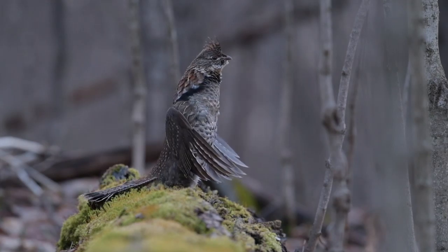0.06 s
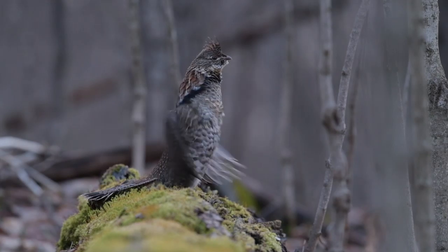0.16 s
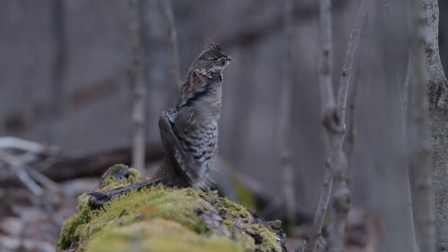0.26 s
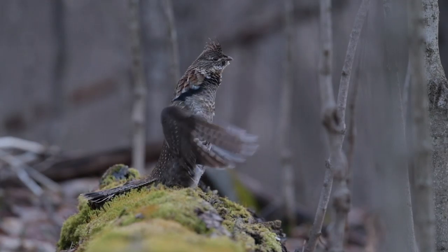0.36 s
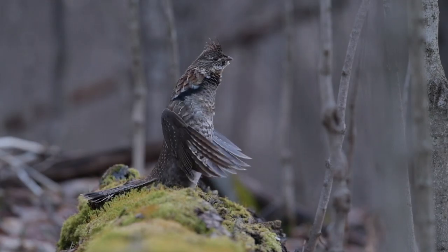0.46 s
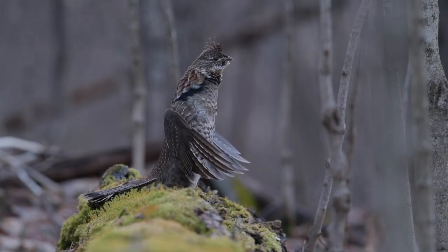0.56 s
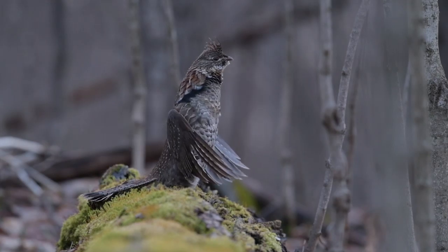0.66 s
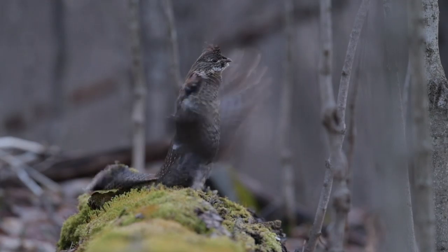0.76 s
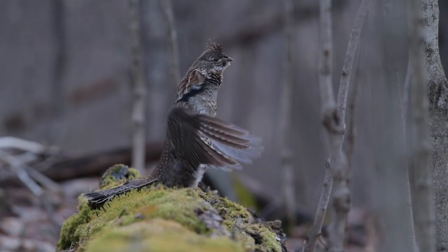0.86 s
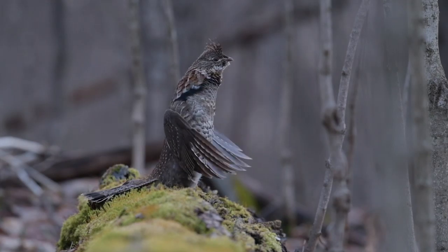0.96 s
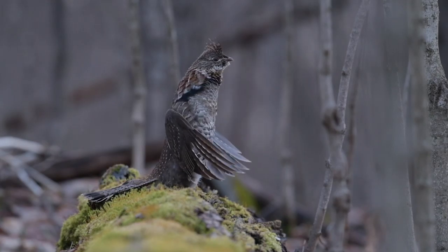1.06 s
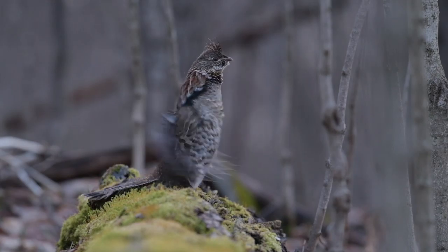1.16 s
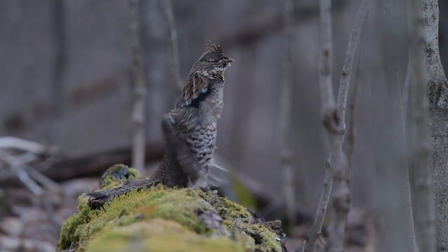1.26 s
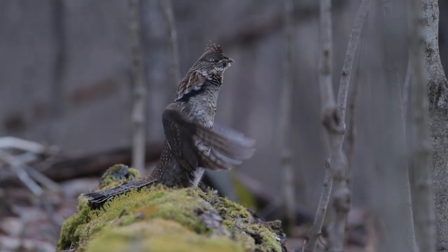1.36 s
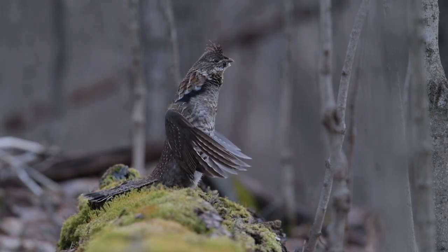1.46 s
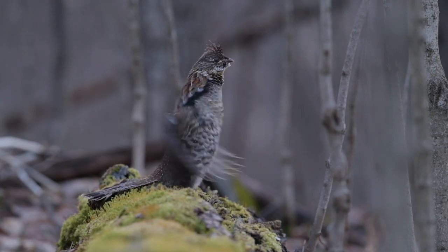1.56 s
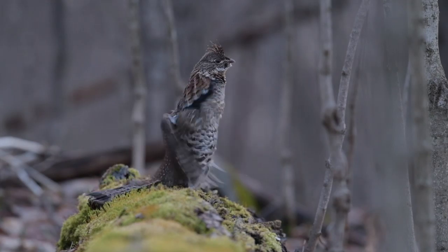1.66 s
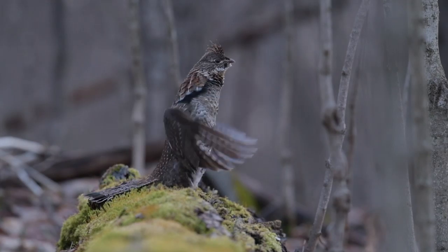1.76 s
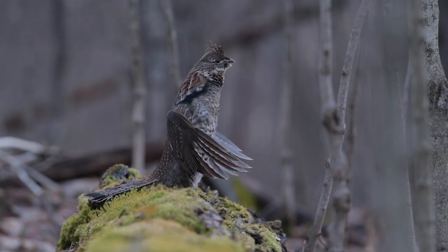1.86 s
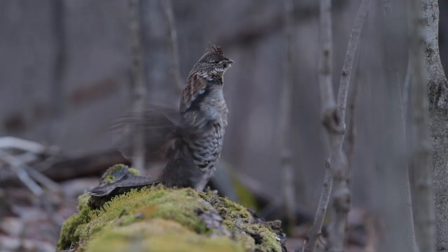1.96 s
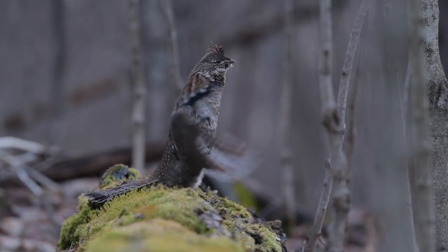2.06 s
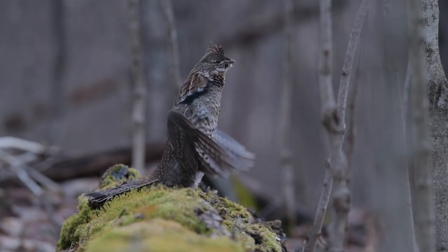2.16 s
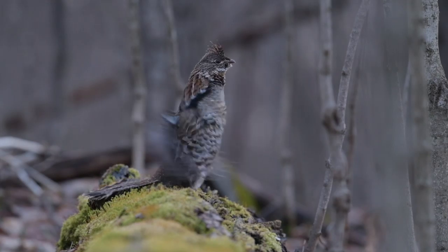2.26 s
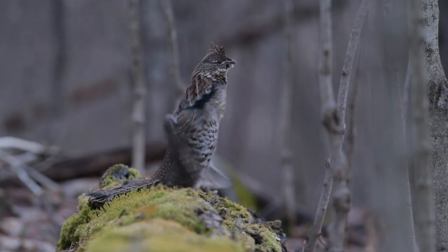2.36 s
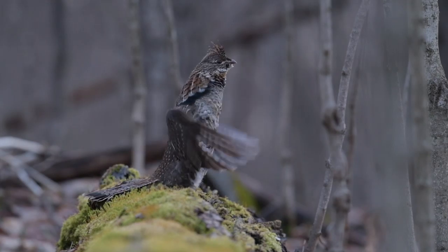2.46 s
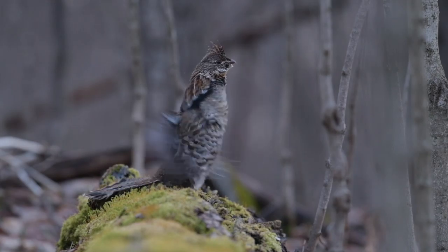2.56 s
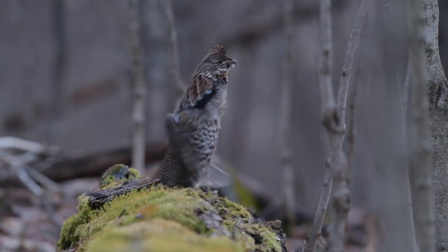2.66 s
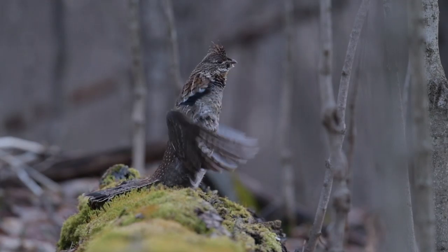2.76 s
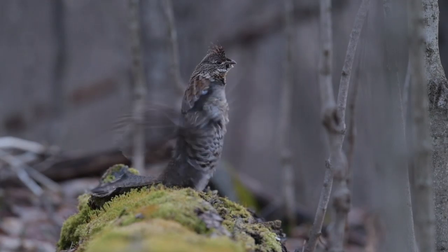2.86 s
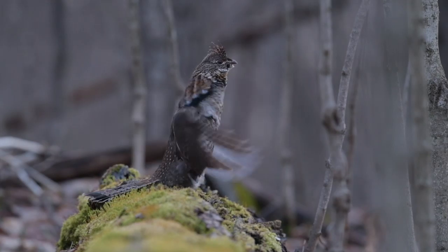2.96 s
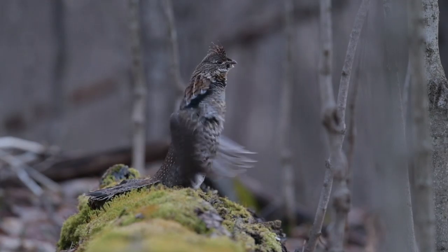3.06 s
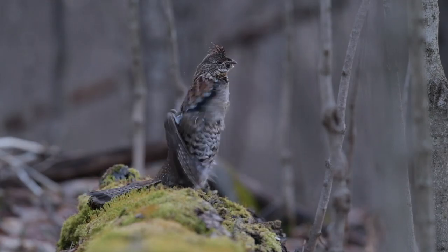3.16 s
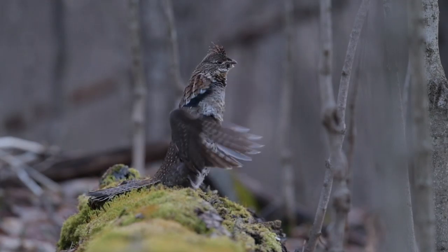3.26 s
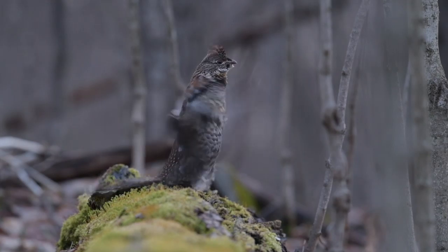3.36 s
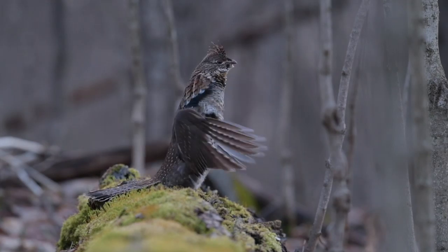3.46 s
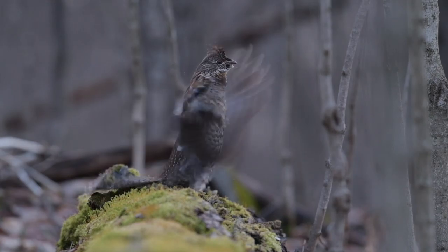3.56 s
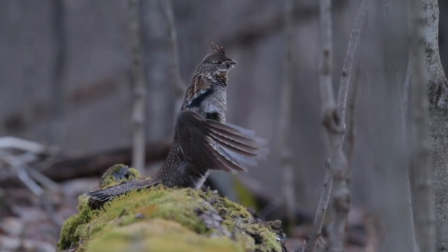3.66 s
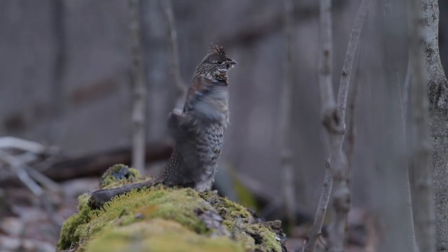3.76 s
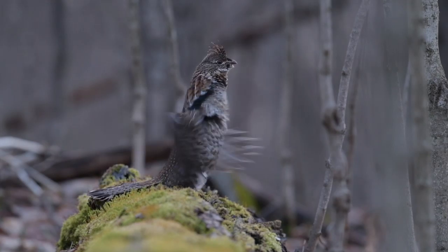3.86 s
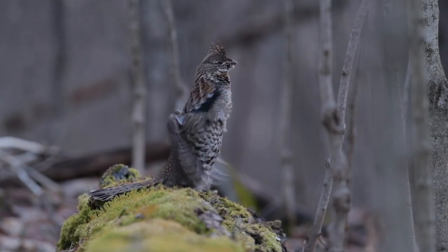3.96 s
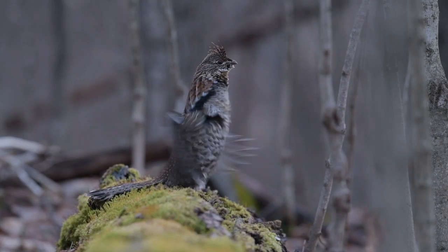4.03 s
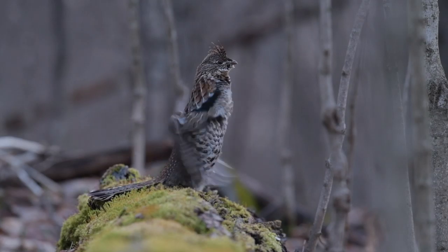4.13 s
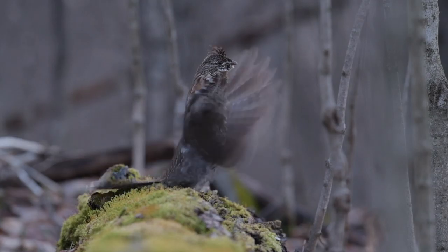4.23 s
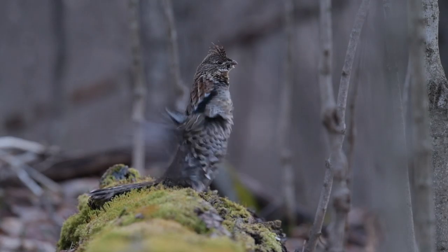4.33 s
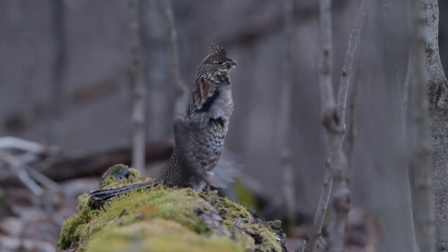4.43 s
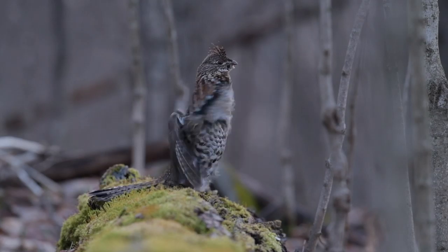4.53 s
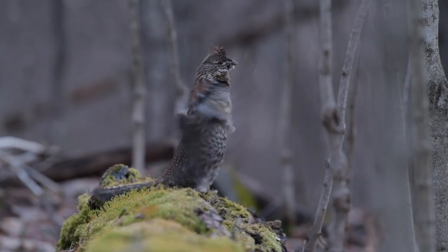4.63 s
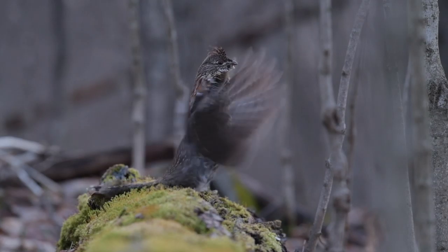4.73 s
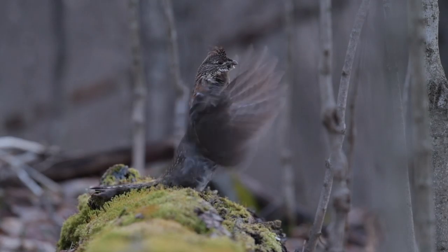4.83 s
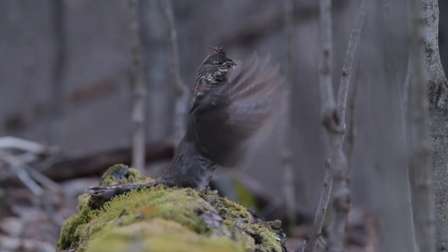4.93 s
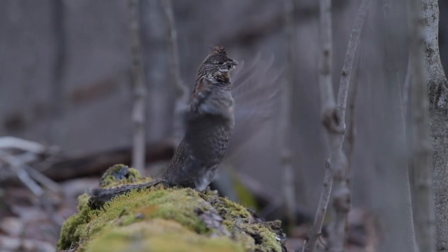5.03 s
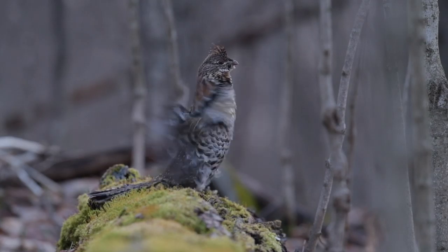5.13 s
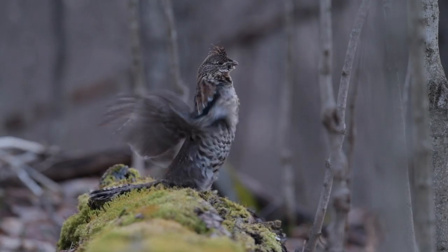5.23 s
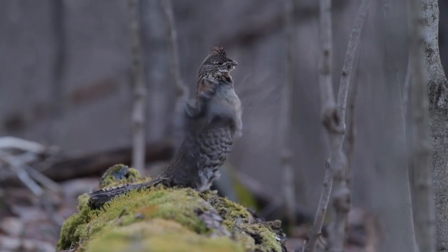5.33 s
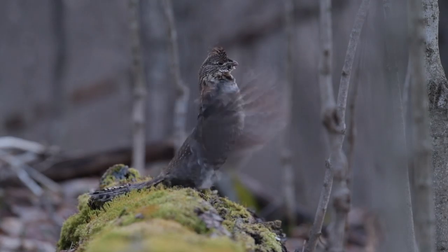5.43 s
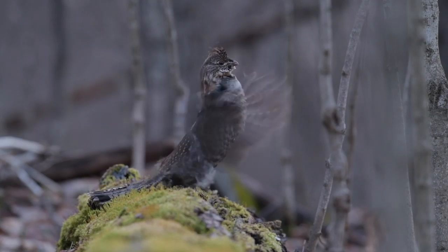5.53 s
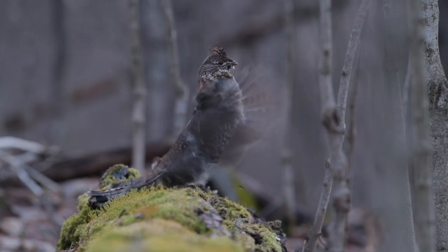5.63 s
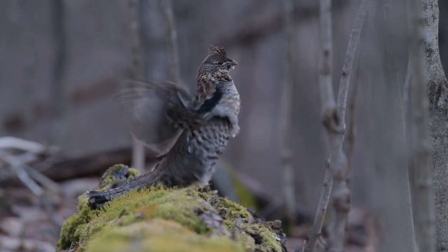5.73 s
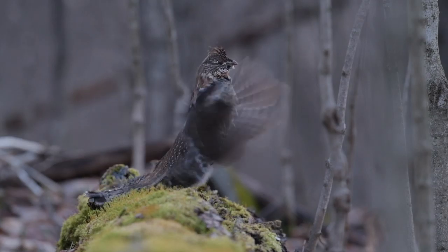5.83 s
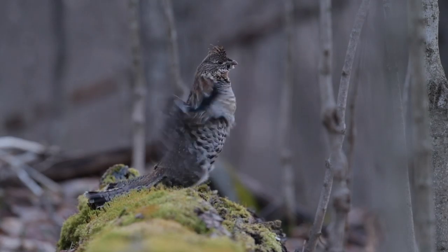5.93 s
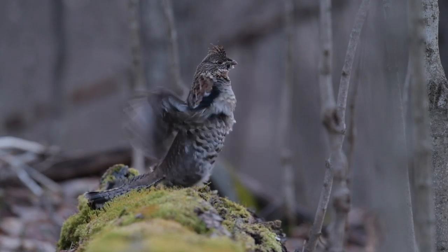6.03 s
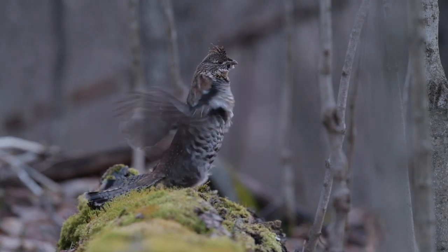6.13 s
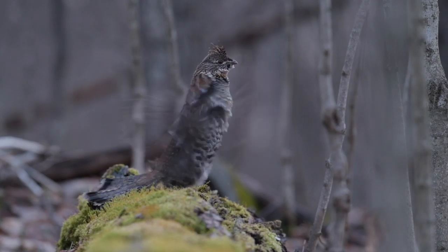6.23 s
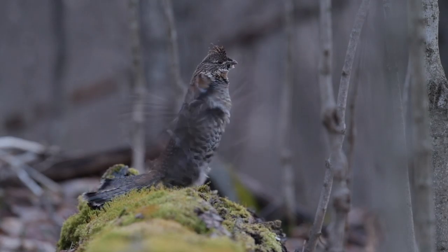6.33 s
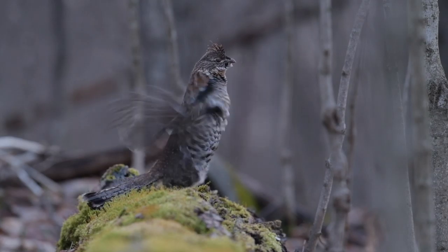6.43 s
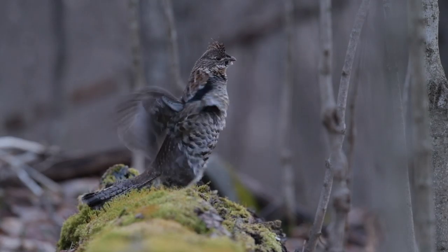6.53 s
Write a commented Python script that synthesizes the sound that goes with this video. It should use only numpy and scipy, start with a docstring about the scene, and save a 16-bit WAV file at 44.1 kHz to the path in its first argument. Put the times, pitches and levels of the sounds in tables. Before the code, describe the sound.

A grouse drums far off in a forest, dull and echoing, and at once another joins on a log close to the microphone. Each near wing beat is a low thump with a rush of feathers. Both birds speed up into a fast roll, then slow and soften. A few small dry ticks, one faint low hoot and faint distant bird whistles come through, over soft hiss and a brief, faint faraway drone.

```python
"""Soft microphone hiss, and a distant drone that swells and fades. Far off in the wood a grouse starts
drumming, dull and echoing; at once another joins from a mossy log near the microphone. Each near wing beat
is a low thump of pushed air with a rush of feathers. Both birds speed up into a roll and slow again.
Small dry ticks, one low hoot and the faint whistles of distant birds come through the drumming."""
import sys
import numpy as np
from scipy import signal
from scipy.io import wavfile
from scipy.ndimage import uniform_filter1d

SR = 44100
rng = np.random.default_rng(int(sys.argv[2]) if len(sys.argv) > 2 else 0)


def put_to_file(sound):
    """Save the sound as 16-bit audio at rate SR, in the file named by the first command-line argument."""
    columns = np.atleast_2d(sound).T  # one column per channel
    safe = np.clip(columns, -1, 1)
    whole_steps = np.round(safe * 32767)
    wavfile.write(sys.argv[1], SR, whole_steps.astype(np.int16))


N = 290619
PULSE_T = np.arange(-.04, .04, 1 / SR)  # seconds around one wing beat


def gain_of(db):
    """Decibels to gain."""
    return 10 ** (np.asarray(db) / 20)


def unit_rms(x):
    """Scales to rms 1."""
    return x / np.sqrt(np.mean(x ** 2) + 1e-20)


def at_hz(table, hz):
    """Reads a spectrum table on a log-frequency axis."""
    f, value = np.transpose(table)
    return np.interp(np.log(hz + 1), np.log(f + 1), value)


def at_times(table, times):
    """Reads the value columns of a table whose rows start with a time."""
    when, *values = np.transpose(table)
    return [np.interp(times, when, v) for v in values]


def bell(t, top, rise, fall, flat=2):
    """A smooth hump of height 1 with its own rise and fall."""
    return np.exp(-abs((t - top) / np.where(t < top, rise, fall)) ** flat)


def train(times, size, shape, lead=.04):
    """One copy of shape for each event, starting lead seconds before it."""
    clicks = np.zeros(N)
    np.add.at(clicks, np.round(np.asarray(times) * SR).astype(int), size)
    return signal.fftconvolve(clicks, shape)[round(lead * SR):][:N]


def blend(times, size, roundness, sharp, rounded, lead=.04):
    """A train whose shape crossfades from sharp to rounded as roundness goes from 0 to 1."""
    sharp_part = train(times, size * (1 - roundness), sharp, lead)
    return sharp_part + train(times, size * roundness, rounded, lead)


def noise(spectrum, patchy_db, likeness=((1, 1), (2, 1)), balance=((1, 0), (2, 0))):
    """Two channels of coloured noise with drifting louder and softer patches."""
    hz = np.fft.rfftfreq(2048, 1 / SR)
    a, b, c, d, patches = rng.standard_normal((N // 512 + 5, 1025, 5)).T
    patches = unit_rms(uniform_filter1d(uniform_filter1d(patches, size=20, axis=0), size=6, axis=1))
    like = np.clip(at_hz(likeness, hz), -1, 1)[:, None]
    left = a + 1j * b
    right = like * left + np.sqrt(1 - like ** 2) * (c + 1j * d)
    tilt = at_hz(balance, hz)[:, None] / 2
    colour = gain_of(at_hz(spectrum, hz)[:, None] + patchy_db * patches)
    frames = np.array([left, right]) * colour * gain_of([tilt, -tilt])
    return unit_rms(signal.istft(frames, nperseg=2048, noverlap=1536)[1][:, :N])


# The microphone's noise floor. Each row: frequency in Hz, relative density in dB.
HISS_SPECTRUM = [(18, -27), (30, 0), (98, 3.5), (200, -9), (700, -12.5), (1490, -17), (3000, -20),
                 (6500, -22.5), (13500, -24.5), (14400, -21.5), (15300, -16.5), (15750, -21)]
# Each row: frequency in Hz, correlation between left and right.
HISS_LIKENESS = [(60, 1), (180, 0.67), (550, 0.6), (1650, 0.5), (4970, 0.55), (15000, -0.0)]
# Each row: frequency in Hz, left minus right in dB.
HISS_BALANCE = [(60, 0), (10000, 0), (11800, -3), (12600, 5), (13500, -14), (14400, 2), (15200, -1),
                (15800, 1)]


def microphone_hiss():
    """Steady noise, strongest and centred in the bass, wider in the treble."""
    return gain_of(-64.5) * noise(HISS_SPECTRUM, patchy_db=1, likeness=HISS_LIKENESS, balance=HISS_BALANCE)


# The drone, a long way off. Each row: band centre in Hz, width in Hz, relative level in dB.
DRONE_BANDS = [(336, 30, -8.5), (505, 82, -5.5), (700, 91, -1), (967, 96, -4.5), (1350, 75, -11.5)]


def distant_drone():
    """Narrow bands of noise that swell and fade together."""
    t, out = np.arange(N) / SR, 0
    for hz, width, db in DRONE_BANDS:
        lowpass = signal.butter(2, width / 2, fs=SR, output="sos")
        a, b = (signal.sosfilt(lowpass, rng.standard_normal((3, N))) for _ in range(2))
        band = a * np.cos(2 * np.pi * hz * t) + b * np.sin(2 * np.pi * hz * t)
        out = out + gain_of(db) * unit_rms(band[0] + 0.44 * band[1:])  # centre plus sides
    return gain_of(-69.1) * unit_rms(out) * bell(t, top=1.41, rise=1, fall=1.55, flat=2.9)


def beat_times(pace_table, first_s):
    """The time of every wing beat, counted from beat 0, and the pace leading up to it."""
    beat, pace = np.transpose(pace_table)
    pace = np.interp(np.arange(1, beat[-1] + 1), beat, pace)
    return first_s + np.append(0, np.cumsum(1 / pace)), np.append(pace[0], pace)


def wing_push(hz, trough, width, centre):
    """A short swing of air pressure; trough, width and centre are in seconds."""
    return -np.cos(2 * np.pi * hz * (PULSE_T - trough)) * bell(PULSE_T, centre, width, width)


def wing_stop(width):
    """The quick pressure drop as the wings stop, just ahead of the trough."""
    u = (PULSE_T + .0026) / width
    return -u * np.exp(-u ** 2)


# The grouse deep in the wood. Each row: beat number, pace in beats per second.
FAR_BEAT_PACE = [(1, 1.889), (6, 3.337), (8, 4.031), (13, 6.182), (16, 7.74), (17, 8.216), (18, 9.008),
                 (20, 10.124), (25, 14.909), (29, 22.14), (30, 18.883), (36, 12.675), (41, 9.303)]
# Each row: time in seconds, thump level in dB, echo level in dB.
FAR_LEVELS = [(.29, -44.3, -43.5), (2.1, -43.5, -44.6), (3, -41.6, -44), (4.9, -42.5, -44),
              (5.2, -43, -50.5), (5.5, -46.5, -50.6), (5.59, -40.5, -51), (5.72, -52, -49),
              (5.89, -45, -46), (6.08, -45.5, -52.5), (6.22, -41.5, -48), (6.52, -43, -53.1)]
# Returns from trunks and slope. Each row: delay in seconds, dB added to the echo level.
SLOPE_ECHOES = [(0.0195, 1), (.045, -17.5), (.064, -7.5), (.082, -11.5), (.1, -13.5)]


def far_grouse():
    """Thumps dulled by distance, each followed by the same few strong echoes."""
    times, _ = beat_times(FAR_BEAT_PACE, first_s=.287)
    thump_db, echo_db = at_times(FAR_LEVELS, times)
    roundness = np.interp(times, [4.7, 6.2], [0, 1])
    sharp = wing_push(hz=84, trough=-.0003, width=.0075, centre=.0043) + .8 * wing_stop(.0023)
    rounded = .9 * wing_push(hz=82, trough=0, width=.009, centre=0) + .5 * wing_stop(.0023)
    echo = wing_push(hz=86, trough=0, width=.0088, centre=.0055) + .35 * wing_stop(.0023)
    out = blend(times, gain_of(thump_db), roundness, sharp, rounded)
    for delay, db in SLOPE_ECHOES:
        heard = times + delay < (N - 1) / SR
        out += train(times[heard] + delay, gain_of(echo_db + db)[heard], echo)
    return out


def wood_reverb(x, t60):
    """Diffuse return from the trunks: sparse taps of random sign, a few differing left and right."""
    t = np.arange(SR // 2) / SR
    signs = rng.choice([-1., 1.], (len(t), 3)).T
    taps = signs * (rng.random((len(t), 3)).T < 400 / SR)  # 400 a second
    taps = (taps[0] + 0.079 * taps[1:]) * gain_of(-60 * t / t60) * (t > .015)
    return signal.fftconvolve(x[None], taps / np.linalg.norm(taps[0]), axes=1)[:, :N]


# The grouse on the log, near the microphone. Each row: beat number, pace in beats per second.
NEAR_BEAT_PACE = [(1, 2.143), (6, 3.894), (9, 5.02), (15, 7.561), (18, 9.279), (22, 11.429), (26, 14.619),
                  (29, 18.716), (30, 21.864), (33, 16.893), (39, 12.256), (42, 10.446), (43, 10.537)]
# Each row: time in seconds, thump level in dB, feather rush level in dB.
NEAR_LEVELS = [(.35, -36, -59.5), (.8, -33, -57), (2.9, -32, -57.5), (3.8, -33.6, -58.5),
               (4.25, -33, -58.5), (4.73, -36.5, -62), (5.05, -37.5, -60.5), (5.25, -36.5, -57.5),
               (5.45, -42.5, -61), (5.82, -38.5, -61.5), (6.11, -42.1, -64.5), (6.21, -55, -71)]
# Beats whose thump sounds softer. Each row: beat number, change in thump level in dB.
SOFTER_THUMPS = [(19, -1.5), (32, -5), (40, -5.1)]


def near_grouse():
    """The thumps and the feather sound of one set of wing strokes, growing rounder as the roll builds."""
    times, pace = beat_times(NEAR_BEAT_PACE, first_s=.353)
    thump_db, rush_db = at_times(NEAR_LEVELS, times)
    for beat, db in SOFTER_THUMPS:
        thump_db[round(beat)] += db
    roundness = np.interp(times, [3.54, 6], [0, 1])
    thumps = wing_thumps(times, gain_of(thump_db), roundness)
    feathers = feather_rush(times, pace, rush_db, roundness) + feather_flick(times, rush_db - 7.5)
    return thumps, feathers


def wing_thumps(times, size, roundness):
    """The wings push the air and stop short, and the stiff flight feathers whip briefly."""
    sharp = .86 * wing_push(hz=76, trough=.0006, width=.0088, centre=.0004)
    rounded = wing_push(hz=69, trough=.0002, width=.0094, centre=-.0006)
    whip = wing_push(hz=291, trough=-.0026, width=.0053, centre=-.00029)
    abruptness = .826 * bell(times, top=3.65, rise=2.4, fall=2.67)  # the hardest stops come midway
    pushes = blend(times, size, roundness, sharp, rounded)
    stops = train(times, size * abruptness, wing_stop(.0019))
    whips = train(times, size * (.045 + .013 * roundness), whip)
    return pushes + stops + whips


def stroke_power(width, crack_db, tail_db):
    """Power envelope of one rush, timed from the thump: a swish, a crack on top of it, a tail."""
    t = np.arange(-.05, .13, 1 / SR)
    swish = gain_of(-5.5) * bell(t, top=-.0013, rise=width, fall=width)
    crack = gain_of(crack_db) * bell(t, top=-.0074, rise=.0044, fall=.0035)
    tail = gain_of(tail_db) * bell(t, top=0, rise=width, fall=.052)
    return swish ** 2 + crack ** 2 + tail ** 2


def crackle(per_s, decay_s):
    """Papery flicks of feather against feather: sudden rises of the envelope that die quickly."""
    size = np.minimum(rng.exponential(1, N), 4) * (rng.random(N) < per_s / SR)
    return signal.lfilter([1], [1, -np.exp(-1 / (decay_s * SR))], size)


# Air through feathers, at close range. Each row: frequency in Hz, relative density in dB.
RUSH_SPECTRUM = [(240, -2), (400, -2.5), (1230, -11.5), (1890, -9.5), (3710, -12), (4070, -13.5),
                 (5530, -13), (7070, -16.5), (11600, -16), (15700, -21)]
# Low bands come later, so each rush darkens. Each row: top of the band in Hz, delay in seconds.
RUSH_DELAYS = [(1400, .006), (4000, .003), (20000, 0)]


def feather_rush(times, pace, rush_db, roundness):
    """Air rushes through the feathers on each stroke; air and leaves stir more as the pace rises."""
    sharp = stroke_power(width=.02, crack_db=3, tail_db=-11.1)
    rounded = stroke_power(width=.017, crack_db=1.6, tail_db=-17)
    power = blend(times, gain_of(rush_db) ** 2, roundness, sharp, rounded, lead=.05)
    flutter = unit_rms(uniform_filter1d(rng.standard_normal(N), size=90))  # feathers slip unevenly
    strokes = np.sqrt(abs(power)) * gain_of(1.5 * flutter)
    strokes *= .97 + .3 * crackle(per_s=260, decay_s=.0018)
    pace_now = np.interp(np.arange(N) / SR, times, pace, right=4.1)  # some stir outlasts the last beat
    stir = gain_of(-71) * (uniform_filter1d(pace_now, size=SR) / 10) ** .96
    air = noise(RUSH_SPECTRUM, patchy_db=.5)[0]
    rush, below = 0, 0
    for top_hz, delay in RUSH_DELAYS:
        up_to_top = signal.sosfiltfilt(signal.butter(2, top_hz, fs=SR, output="sos"), air)
        rush = rush + (up_to_top - below) * (np.roll(strokes, round(delay * SR)) + stir)
        below = up_to_top
    return rush


def feather_flick(times, db):
    """A dull flick as the feathers spread just ahead of each thump."""
    spread = train(times, gain_of(db), bell(PULSE_T, top=-.018, rise=.005, fall=.005), lead=.0397)
    return spread * unit_rms(signal.lfilter(*signal.iirpeak(1870, Q=2.6, fs=SR), rng.standard_normal(N)))


# Small ticks, centred and without echo. Each row: start in seconds, level in dB, pitch in Hz.
DRY_TICKS = [(1.677, -55, 3430), (2.6339, -52, 2120), (4.5155, -55, 2170), (4.688, -53, 2200),
             (5.2573, -64, 2100), (5.2809, -47.5, 2290), (5.306, -56, 2670), (5.3332, -50, 1940),
             (5.3893, -49, 2370), (5.4497, -51, 2080), (5.4868, -64, 2600), (5.808, -54.5, 2740),
             (5.891, -56, 2600)]


def dry_ticks():
    """Short gritty puffs of noise with a broad ring."""
    out, t = np.zeros(N), np.arange(400) / SR
    envelope = np.exp(-t / .0039) * np.minimum(t / .00015, 1)
    for start, db, hz in DRY_TICKS:
        grit = rng.standard_normal(len(t))
        ring = unit_rms(signal.lfilter(*signal.iirpeak(hz, Q=1.5, fs=SR), grit))
        out += train([start], gain_of(db), (.46 * ring + .27 * grit) * envelope, lead=0)
    return out


# One low hoot and small birds whistling, far from the microphone.
# Each row: start in seconds, length in seconds, first pitch in Hz, last pitch in Hz, level in dB.
BIRD_CALLS = [(2.33, 0.21, 495, 485, -75), (2.802, 0.135, 3550, 3460, -78), (2.941, 0.12, 3470, 3450, -76),
              (2.899, 0.12, 2760, 2720, -78.5), (5.299, 0.44, 2604, 2614, -76),
              (5.661, 0.37, 3565, 3400, -75), (5.758, 0.16, 2720, 2740, -76), (5.995, .22, 4170, 4130, -82)]


def distant_calls():
    """Gliding tones a little to the left, wavering as if smeared by echoes over the distance."""
    out = np.zeros(N)
    for start, length, first_hz, last_hz, db in BIRD_CALLS:
        n = round(length * SR)
        a, b = (unit_rms(uniform_filter1d(rng.standard_normal(SR), size=450))[:n] for _ in range(2))
        glide = np.exp(2j * np.pi * np.cumsum(np.linspace(first_hz, last_hz, n)) / SR)
        tone = (glide * (1 + .52 * (a + 1j * b))).real
        out += train([start], gain_of(db), tone * signal.windows.tukey(n, .4), lead=0)
    return out * gain_of([[1.5], [-1.5]])


def scene():
    """Both grouse straight ahead of the microphone, the wood around them, the hiss under all."""
    far = far_grouse()
    thumps, feathers = near_grouse()
    centre = far + thumps + feathers + dry_ticks()
    reverb = gain_of(-23.5) * wood_reverb(thumps, t60=.74) + gain_of(-15.5) * wood_reverb(far, t60=1)
    return microphone_hiss() + distant_drone() + centre + reverb + distant_calls()


def record(dry):
    """The microphone drops the bass below 18 Hz and the treble above 15.8 kHz."""
    low_cut = signal.butter(1, 18, "highpass", fs=SR, output="sos")
    high_cut = signal.firwin(1023, 15800, window=("kaiser", 9), fs=SR)
    return signal.oaconvolve(signal.sosfiltfilt(low_cut, dry), high_cut[None], "same")


dry = scene()
out = record(dry)
put_to_file(out)
```